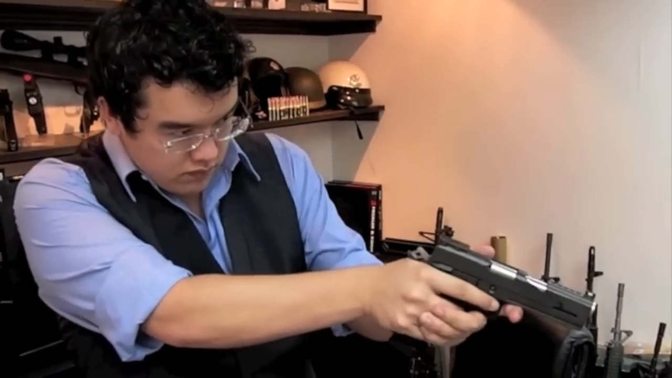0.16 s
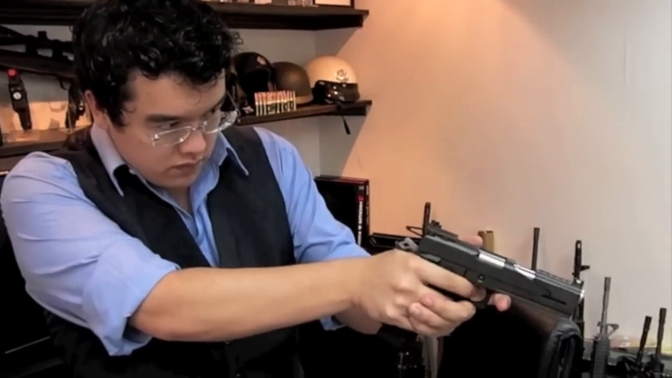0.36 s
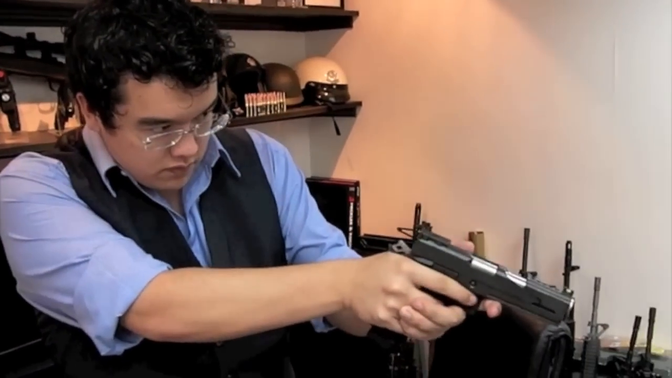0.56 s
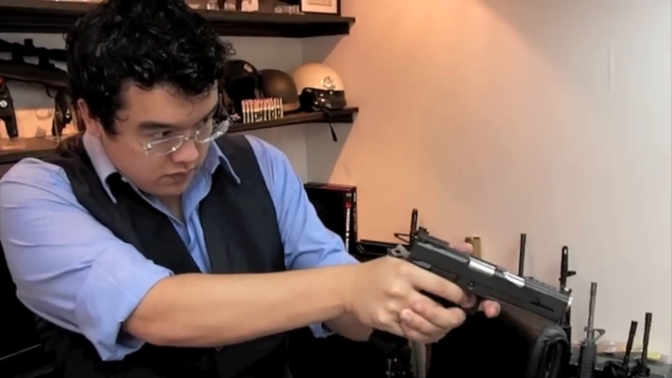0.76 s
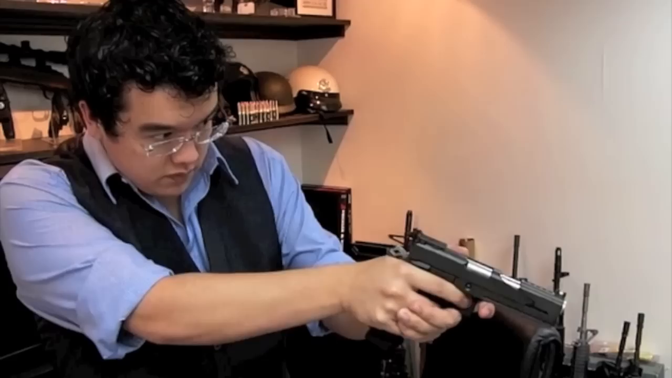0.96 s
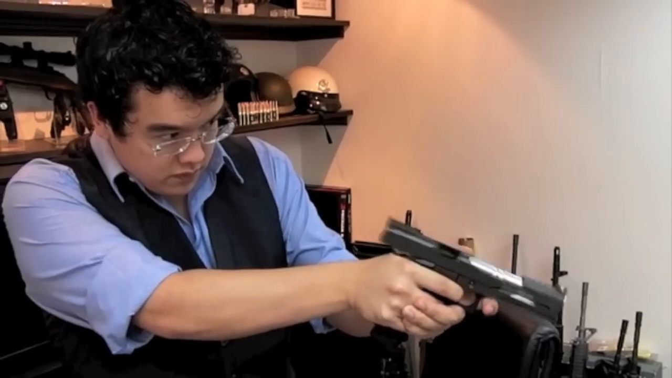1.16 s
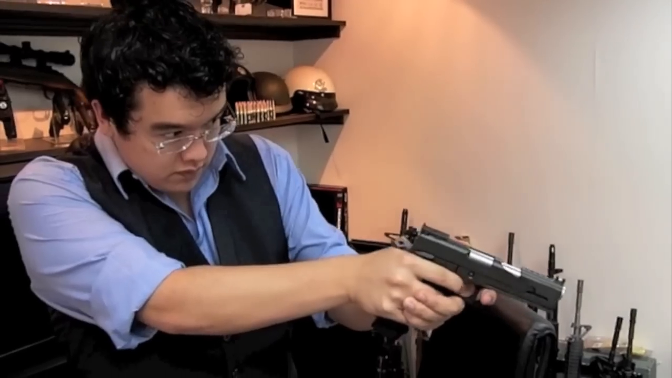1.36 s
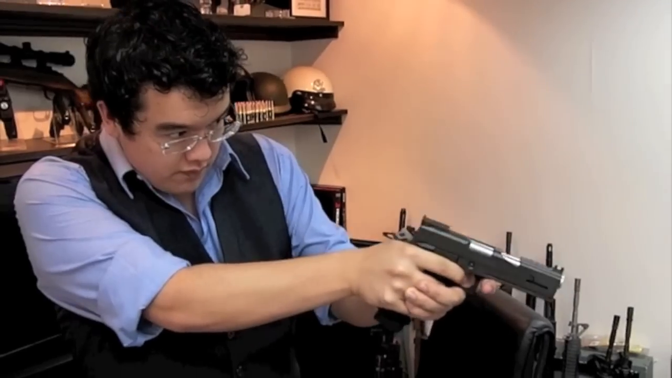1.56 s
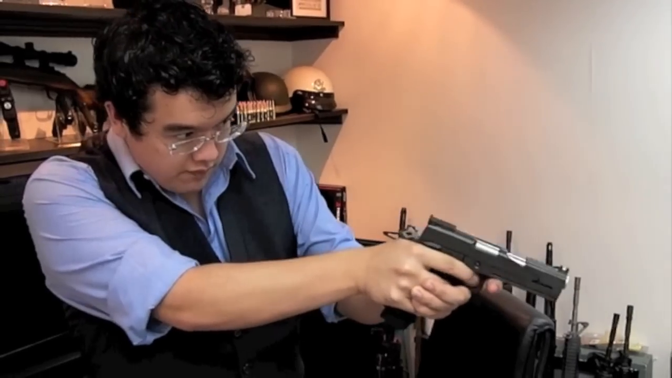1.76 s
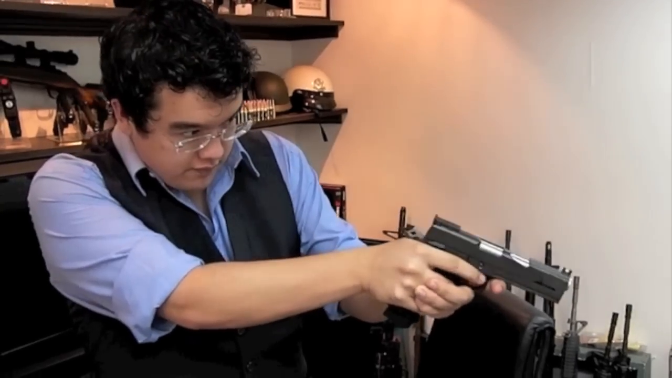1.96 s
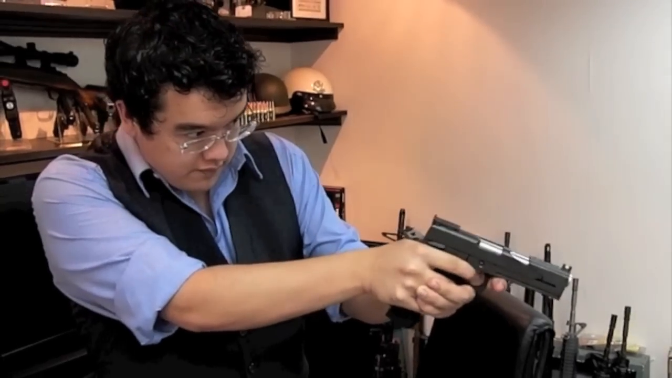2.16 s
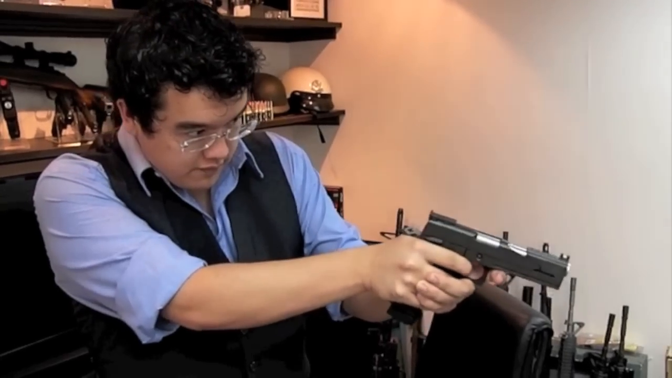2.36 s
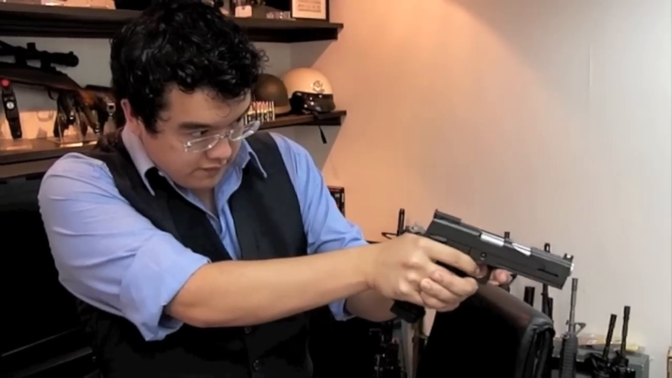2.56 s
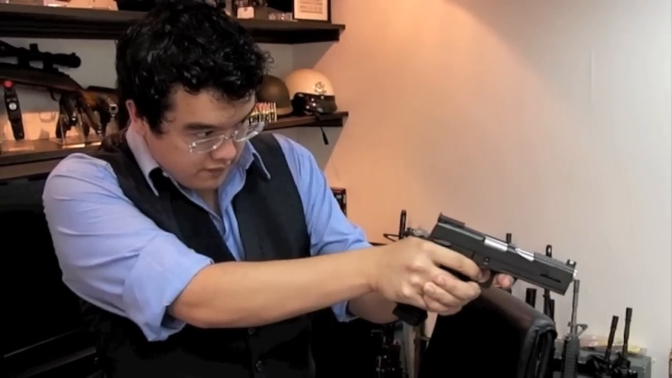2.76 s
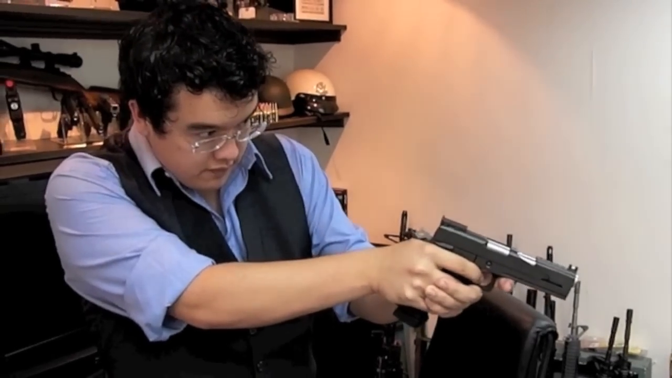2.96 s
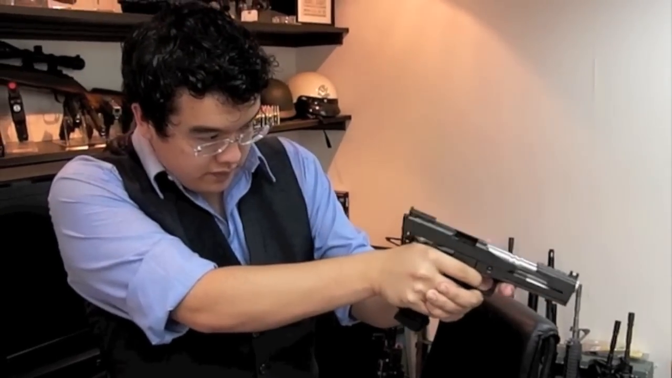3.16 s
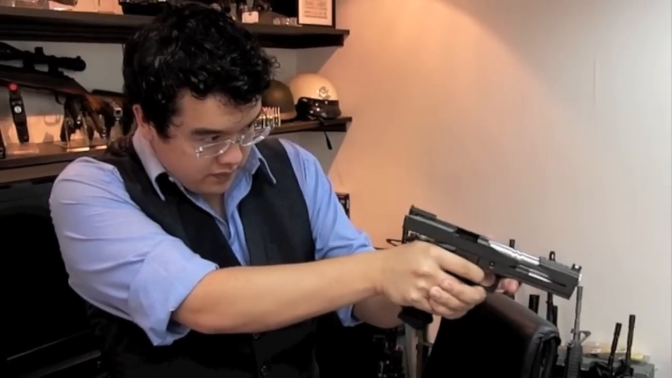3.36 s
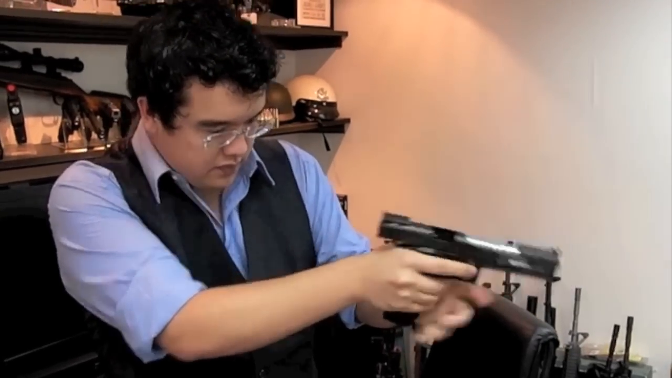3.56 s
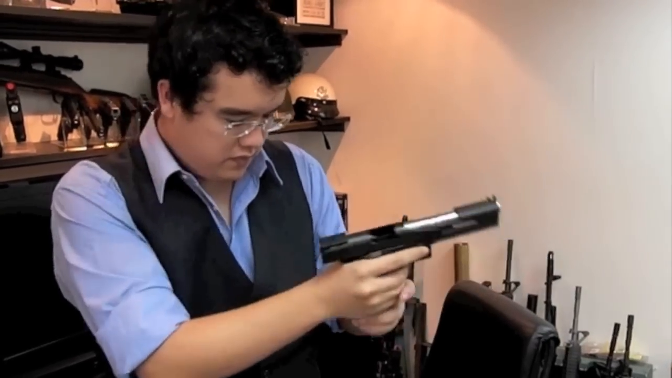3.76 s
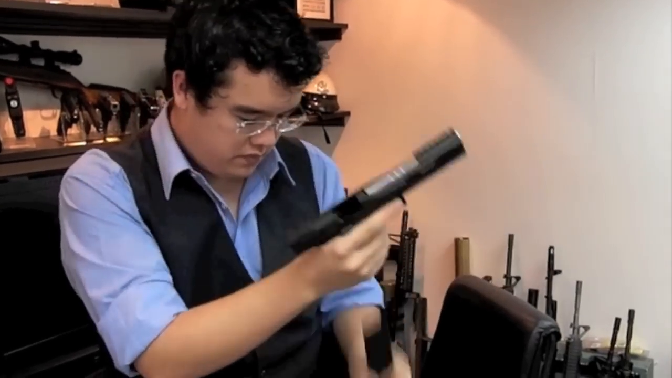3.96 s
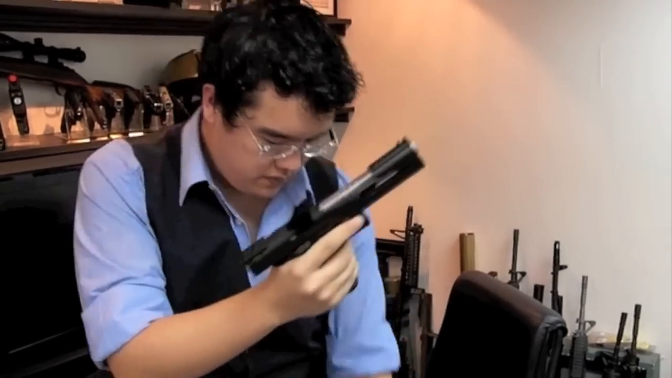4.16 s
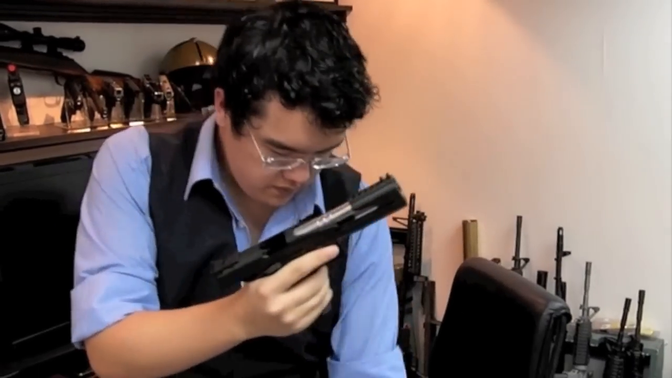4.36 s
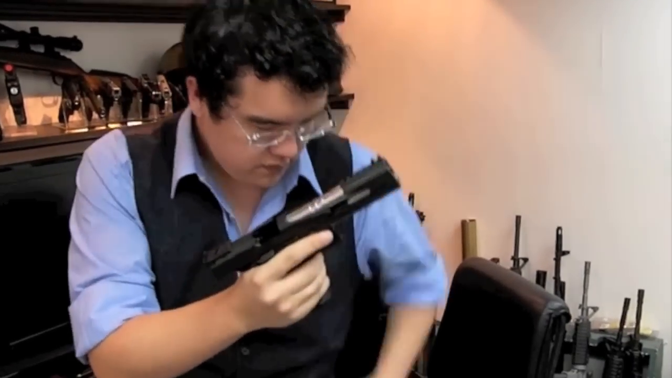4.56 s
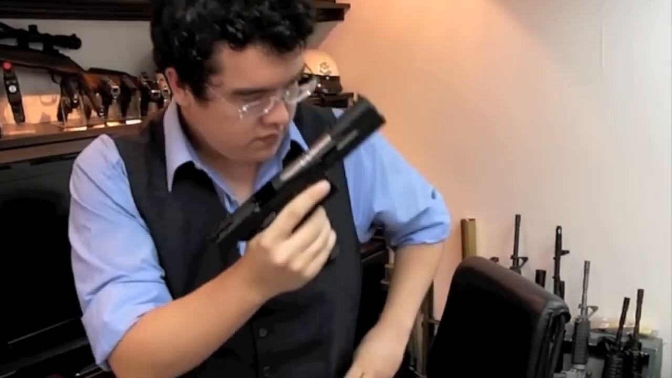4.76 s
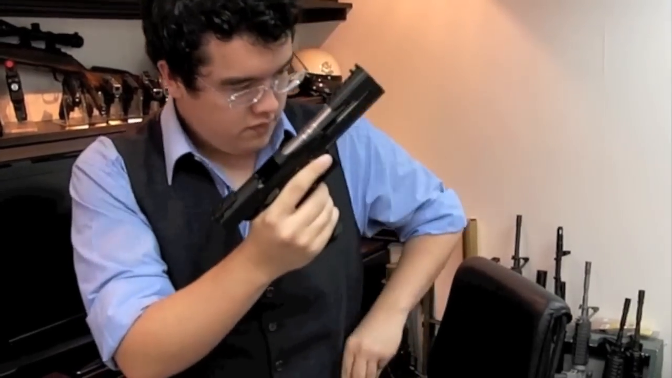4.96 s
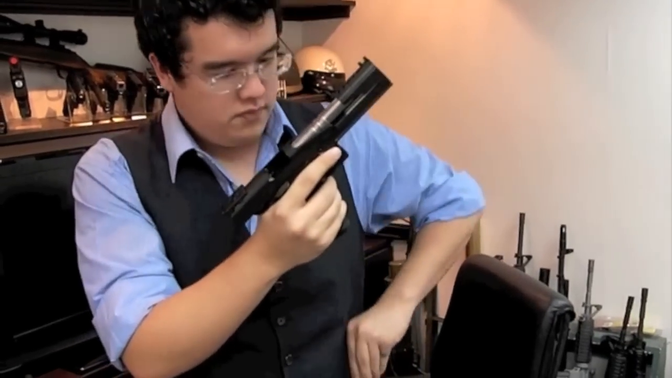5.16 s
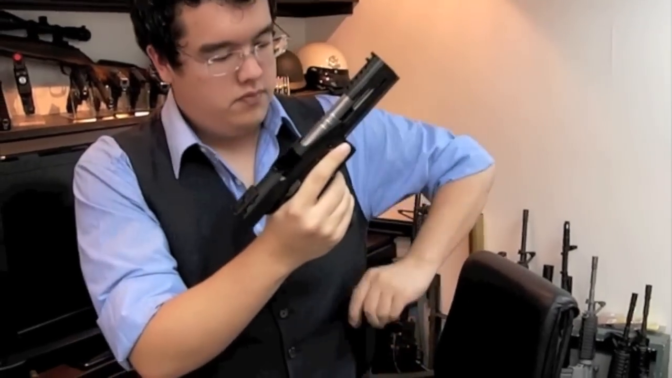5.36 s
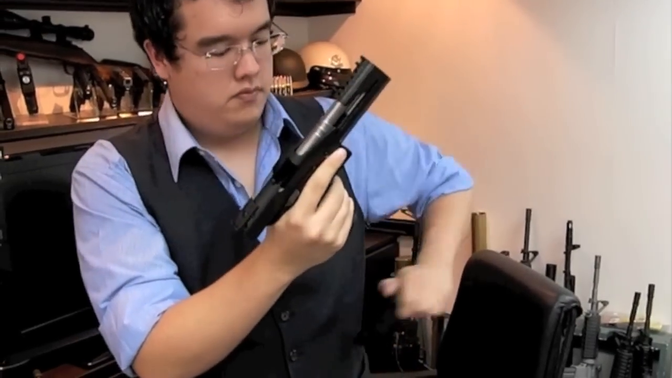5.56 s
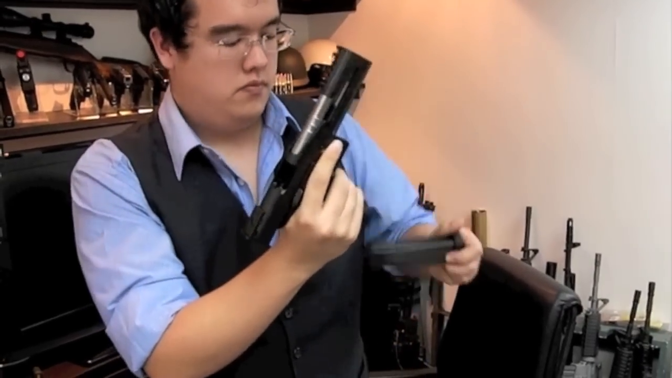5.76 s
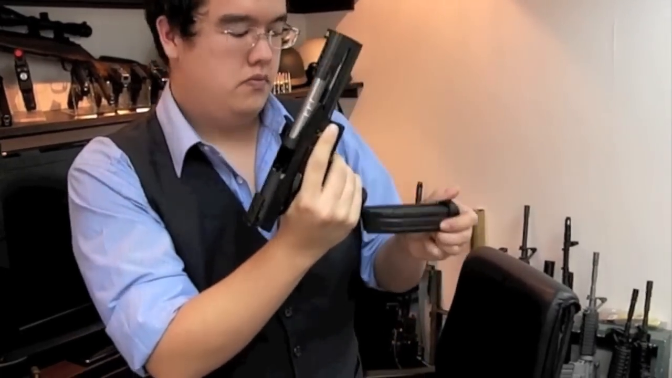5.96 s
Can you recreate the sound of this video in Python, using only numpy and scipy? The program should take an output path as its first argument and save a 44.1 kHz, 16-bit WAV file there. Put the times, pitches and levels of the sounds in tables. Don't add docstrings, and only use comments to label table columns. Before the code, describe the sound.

Dry, punchy gas cracks with a hard slide snap at their tail, heard very close with short room reverberation. The pace goes from deliberate to rapid, pauses, and ends on a single crack that leaves the slide open. Then come light ticks, cloth rubs and magazine clacks. Low mains hum, airy noise and a faint high whine sit beneath, dipping after shots.

```python
import sys
import numpy as np
from scipy import signal
from scipy.fft import rfft, irfft
from scipy.io import wavfile

SR = 44100
rng = np.random.default_rng(int(sys.argv[2]) if len(sys.argv) > 2 else 0)


def to_linear_factor(level_db):
    exponent = np.asarray(level_db, float) / 20
    return 10 ** exponent


def wav_record(signal):
    frames = np.transpose(np.atleast_2d(signal))
    bounded = np.clip(frames, -1, 1)
    quanta = np.round(bounded * 32767).astype(np.int16)
    wavfile.write(sys.argv[1], SR, quanta)


N = 269010
BURST_PEAK_S = .05


def at_hz(points, hz):
    points = np.array(points)
    return np.interp(np.log(hz + 1), np.log(points[:, 0]), points[:, 1])


def rms_one(x):
    return x / np.sqrt(np.mean(x ** 2) + 1e-20)


def coloured(x, spectrum):
    gain = to_linear_factor(at_hz(spectrum, np.fft.rfftfreq(8192, 1 / SR)))
    cepstrum = irfft(np.log(gain))
    cepstrum[1:4096] *= 2
    cepstrum[4097:] = 0
    response = irfft(np.exp(rfft(cepstrum)))[:4096]
    return signal.fftconvolve(x, response)[:len(x)]


def resonance(x, hz, width_hz):
    r = np.exp(-np.pi * width_hz / SR)
    zeros = np.array([1, 0, -1]) * (1 - r * r) / 2
    poles = [1, -2 * r * np.cos(2 * np.pi * hz / SR), r * r]
    return signal.lfilter(zeros, poles, x)


def narrow(x, hz, width_hz):
    return rms_one(resonance(resonance(x, hz, width_hz), hz, width_hz))


def lagged(x, lag_s):
    lag = np.exp(-1 / (lag_s * SR))
    return signal.lfilter([1 - lag], [1, -lag], x)


def sine(hz, t):
    return np.sin(2 * np.pi * hz * t)


def add(out, s, sound):
    at = int(s * SR)
    piece = sound[max(-at, 0):N - at]
    start = max(at, 0)
    out[start:start + len(piece)] += piece


def burst(rise_s, fall_s):
    t = np.arange(8820) / SR - BURST_PEAK_S
    shape = np.exp(np.where(t < 0, t / max(rise_s, 1e-4), -t / max(fall_s, 1e-4)))
    return shape * rng.standard_normal(len(t))


def background_db(t):
    resting_db, ducked_db, recovery_db_per_s = -41, -56, 4
    db = np.full(N, float(resting_db))
    for s, *_ in SHOTS:
        recovering = ducked_db + recovery_db_per_s * (t - s)
        db = np.where(t < s, db, np.minimum(resting_db, recovering))
    return resting_db + lagged(db - resting_db, lag_s=.04)


# (frequency [Hz], level [dB], width [Hz])
HUM_LINES = [(53.3, -6.5, 5), (100.3, 0, 7.6), (200.6, -5, 13), (299.8, -6.5, 3.1), (340.9, -15.5, 17),
             (389, -14, 6.9), (540, -17.5, 2.2), (748, -16, 2), (902, -14.5, 6.4), (1445, -16, 6.6)]
# (frequency [Hz], density [dB per Hz])
AIR_SHARED = [(15, -44), (25, -6.5), (100, 2), (300, -6.5), (1800, -18.5), (2500, -22), (2850, -50),
              (3300, -34.5), (5400, -37.5), (7000, -60.5), (12000, -42.5), (15500, -45.5), (16200, -72.5)]
# (frequency [Hz], density [dB per Hz])
AIR_APART = [(15, -63), (25, -6), (190, -9), (714, -14.5), (860, -10), (1230, -11.5), (1500, -9),
             (2350, -14.5), (2840, -43), (3250, -17), (4870, -29), (7000, -27), (10500, -27), (16000, -25)]


def background():
    white = rng.standard_normal((4, N))
    t = np.arange(N) / SR
    hum = sum(to_linear_factor(db) * narrow(white[2], hz, width_hz) for hz, db, width_hz in HUM_LINES)
    hum = hum + to_linear_factor(-5) * sine(100, t) + to_linear_factor(-12) * sine(200, t) + to_linear_factor(-10) * sine(300, t)
    whine = to_linear_factor(-12) * sine(15735, t)
    gusts = to_linear_factor(4.5 * rms_one(resonance(white[3], hz=3, width_hz=5)))
    rumble = gusts * rms_one(resonance(white[3, ::-1], hz=45, width_hz=40))
    fan = narrow(white[1, ::-1], hz=1450, width_hz=3.9)
    air_shared = rms_one(coloured(white[0], AIR_SHARED))
    air_apart = rms_one(coloured(white[1], AIR_APART))
    both = to_linear_factor(-1.5) * hum + to_linear_factor(-4) * air_shared + to_linear_factor(-8) * rumble + whine
    apart = to_linear_factor(-14) * fan + to_linear_factor(-34) * hum + to_linear_factor(-5.5) * air_apart + to_linear_factor(-17) * whine
    return np.array([both, apart]) * to_linear_factor(background_db(t))


# (time [s], level [dB], centre [Hz], swell [s])
RUBS_HEARD = [(0.02, -36.5, 2700, 0.0047), (0.442, -46, 2460, 0.018), (3.088, -49, 2000, 0.016),
              (3.869, -45.5, 2700, .04), (3.912, -44, 8900, 0.0097), (3.918, -37.5, 4230, 0.026),
              (3.961, -43.5, 2170, 0.0089), (4.409, -35, 1935, 0.0096), (4.562, -49, 2470, 0.04),
              (4.739, -50, 2000, 0.011), (5.089, -44.5, 1966, 0.01), (5.5, -56, 7000, 0.025),
              (5.62, -54.5, 990, 0.07)]
# (time [s], level [dB], centre [Hz], fall [s])
TICKS_HEARD = [(0.423, -38, 3960, 0.0079), (.840, -34.5, 3040, .016), (1.182, -40, 3150, 0.035),
               (2.854, -43.5, 4040, 0.0043), (3.011, -38, 6220, 0.0051), (3.058, -37.5, 3970, 0.0076),
               (3.504, -31.5, 5130, 0.011), (3.511, -35, 2145, 0.0047), (3.677, -27, 2360, 0.0032),
               (3.823, -39.5, 5050, .002), (3.846, -33, 5900, 0.0054), (3.942, -31.5, 2524, 0.009),
               (4.35, -27, 3950, 0.0082), (4.364, -21.5, 630, 0.0023), (4.371, -36, 1740, 0.011),
               (4.649, -23.5, 5000, 0.005), (4.65, -30, 2250, 0.007), (5.238, -45, 1725, 0.021),
               (5.452, -41, 2150, 0.012), (5.535, -31, 2610, 0.0054)]


def handling():
    out = np.zeros(N)
    contacts = [(s, db, hz, .0007, fall_s, 1.7) for s, db, hz, fall_s in TICKS_HEARD]
    contacts += [(s, db, hz, swell_s, 1.4 * swell_s, 2.2) for s, db, hz, swell_s in RUBS_HEARD]
    for s, db, hz, rise_s, fall_s, octaves in contacts:
        edges = np.clip(hz * 2 ** (np.array([-.5, .5]) * octaves), 50, 20000)
        bandpass = signal.butter(1, edges, "band", fs=SR, output="sos")
        noise = signal.sosfilt(bandpass, burst(rise_s, fall_s))
        evened = noise * np.sqrt(SR / 2 / (edges[1] - edges[0])) / 3
        add(out, s - BURST_PEAK_S, to_linear_factor(db) * evened)
    return out


def pop(hz, width_hz):
    t = np.arange(900) / SR
    return -sine(hz, t) * np.exp(-np.pi * width_hz * t)


def strike(out, s, db, rise_s, fall_s):
    add(out, s - BURST_PEAK_S, to_linear_factor(db) * burst(rise_s, fall_s))


# (frequency [Hz], level [dB], 60 dB decay [s])
SLIDE_RING = [(1190, -9, .05), (1357, -12, .05), (2110, 5, .008), (2150, -9, .06), (2290, -10, .05),
              (3600, -3, .01), (10600, 4, .008)]


def slide_ring(slam_db):
    t = np.arange(9000) / SR
    ring = np.zeros(len(t))
    for hz, db, t60 in SLIDE_RING:
        luck = rng.normal(0, 1.5)
        ring += to_linear_factor(slam_db - 20 + db + luck - 60 * t / t60) * sine(hz, t)
    return ring


# (time [s], blast level [dB], rear stop level [dB], slide slam level [dB])
SHOTS = [
    (.048, -0.5, -42, -18.5),
    (.461, 0, -14.5, -17),
    (.866, 1, -19.5, -17.5),
    (1.211, 0.5, -20.5, -13.5),
    (1.468, -6, -35, -10.5),
    (1.673, -5.5, -14, -9.5),
    (1.889, -2, -19, -11.5),
    (2.111, -3.5, -12, -11.5),
    (2.346, -4.5, -10, -10.5),
    (3.132, -3, -34.5, -88.5),
]
# (frequency [Hz], level [dB])
GAS_JET = [(200, -14), (1000, -9.5), (2000, -5.5), (4000, 0.5), (7000, -1.5), (16000, -2.5)]


def pistol(stance):
    slam_s, bounce_s = .0585, .0155
    jet, out = np.zeros((2, N))
    for s, blast_db, stop_db, slam_db in SHOTS[stance::3]:
        strike(jet, s - .0035, blast_db - 22, rise_s=.0005, fall_s=.003)
        hiss = np.diff(burst(rise_s=.0005, fall_s=.002))
        add(jet, s - BURST_PEAK_S - .0012, to_linear_factor(blast_db - 9) * hiss)
        strike(jet, s + .00099, blast_db + 1.5, rise_s=.0008, fall_s=.0026)
        muzzle = pop(hz=377, width_hz=390) + .63 * pop(hz=840, width_hz=230)
        add(out, s - .0003, to_linear_factor(-11.5) * muzzle)
        wall = pop(hz=702, width_hz=330) + .6 * pop(hz=1250, width_hz=700)
        add(out, s + .0116, to_linear_factor(-3.5) * wall)
        strike(jet, s + .0235, stop_db, rise_s=.002, fall_s=.003)
        strike(jet, s + slam_s + .0008, slam_db + 5, rise_s=.0009, fall_s=.0011)
        strike(jet, s + slam_s + bounce_s, slam_db - 11, rise_s=.001, fall_s=.003)
        ring = slide_ring(slam_db)
        add(out, s + slam_s, ring)
        add(out, s + slam_s + bounce_s, .9 * ring)
    return out + coloured(jet, GAS_JET)


# (frequency [Hz], 60 dB decay [s])
ROOM_DECAY = [(100, 0.17), (260, 0.52), (700, 0.2), (1840, .36), (4850, 0.42), (12800, 0.32)]


def room(white, onset_s):
    t = np.arange(SR // 2) / SR
    fresh = rng.standard_normal(white.shape)
    out = 0
    for k, hz in enumerate(60 * 2. ** np.arange(9)):
        edges = [hz / np.sqrt(2), min(hz * np.sqrt(2), 21000)]
        bandpass = signal.butter(2, edges, "band", fs=SR, output="sos")
        noise = white if k < 5 else fresh
        out = out + signal.sosfilt(bandpass, noise[k % 2]) * to_linear_factor(-60 * t / at_hz(ROOM_DECAY, hz))
    out = out * (1 - np.exp(-(t / onset_s) ** 2))
    return out / np.sqrt(np.sum(out ** 2))


def notched(x):
    x = x - .9 * resonance(x, hz=2870, width_hz=330)
    return x - .6 * resonance(x, hz=5000, width_hz=200)


# (delay [s], level [dB])
NEAR_WALLS = [(.0122, -14), (.0245, -18), (.036, -21)]


def at_ports(sources, colour, level_db, wet_db, onset_s):
    white = rng.standard_normal((2, SR // 2))
    direct = sum(sources)
    heard = direct.copy()
    scatter = rng.standard_normal((len(NEAR_WALLS), 60)) / np.sqrt(60)
    scatter = signal.lfilter([.6], [1, -.6], scatter)
    for (s, db), taps in zip(NEAR_WALLS, scatter):
        add(heard, s, to_linear_factor(db) * np.convolve(direct, taps)[:N])
    for source in sources:
        heard = heard + to_linear_factor(wet_db) * signal.fftconvolve(source, room(white, onset_s))[:N]
    return to_linear_factor(level_db) * notched(coloured(heard, colour))


# (frequency [Hz], width [Hz], share [ratio])
LOW_MODES = [(202.2, 13, 0.9), (257, 120, -0.68), (325, 83, 0.45), (441.6, 76, -0.56), (528, 22, 0.48),
             (667.4, 5.5, -0.031), (852.7, 14, 0.15)]


def standing_waves(x):
    return x + sum(np.clip(share, -1, 2) * resonance(x, hz, width_hz) for hz, width_hz, share in LOW_MODES)


# (frequency [Hz], level [dB])
SUM_COLOUR = [(65, -39), (110, -16.5), (325, 0.5), (376, -2), (463, 1.5), (536, -8), (717, -2), (848, -9.5),
              (1230, 2), (2210, -1), (2840, -10), (4200, -12), (7250, -38), (10500, -20), (16000, -39.5)]
# (frequency [Hz], level [dB])
DIFFERENCE_COLOUR = [(262, -28), (450, -15.5), (900, -16), (1340, 3), (2190, 3), (2650, 1.5), (3200, -8.5),
                     (4200, -8), (5500, -12), (7570, -31.5), (10500, -5.5), (11900, -7), (14200, -23.5),
                     (16000, -39.5)]


def scene():
    sources = [pistol(stance=0), pistol(stance=1) + handling(), pistol(stance=2)]
    both, apart = background()
    both = both + standing_waves(at_ports(sources, SUM_COLOUR, level_db=10, wet_db=-6, onset_s=.0012))
    apart = apart - at_ports(sources, DIFFERENCE_COLOUR, level_db=9.5, wet_db=-1.62, onset_s=.003)
    return np.array([both + apart, both - apart])


# (frequency [Hz], level [dB])
RIGHT_CAPSULE = [(60, 0.5), (700, 1.5), (1300, -3.5), (4400, -1), (7500, 4.5), (10500, 2.5), (13000, -2)]


def unequal_capsules(pair):
    return np.array([pair[0], coloured(pair[1], RIGHT_CAPSULE)])


def limiter(pair, knee_db, share, release_db_per_s):
    level_db = 20 * np.log10(np.max(np.abs(pair), axis=0) + 1e-9)
    ramp = release_db_per_s * np.arange(N) / SR
    held_db = np.maximum.accumulate(share * (level_db - knee_db) + ramp) - ramp
    cut_db = np.maximum(held_db, 0)
    return pair * to_linear_factor(-lagged(cut_db, lag_s=.011))


def patchy_treble(pair, sum_db, difference_db, quiet_db):
    hz, _, spec = signal.stft([pair[0] + pair[1], pair[0] - pair[1]], SR, "cosine", 2048)
    edges = np.searchsorted(hz, np.geomspace(2500, 17000, 30))
    frame = np.sum(np.abs(spec[:, 46:]) ** 2, axis=(0, 1))
    attack = frame > 5 * np.roll(frame, 1)
    frame = frame * np.minimum(frame * to_linear_factor(-2 * quiet_db), 1) ** .15
    bar = frame * to_linear_factor(-2 * np.array([[sum_db], [difference_db]]))
    for low, high in zip(edges, edges[1:]):
        power = np.mean(np.abs(spec[:, low:high]) ** 2, axis=1)
        luck = to_linear_factor(rng.normal(0, 1, bar.shape) * [[5.5], [3.]])
        kept = (power > bar * luck) | attack
        spec[:, low:high] *= kept[:, None]
    both, apart = signal.istft(spec, SR, "cosine", 2048)[1][:, :N] / 2
    return np.array([both + apart, both - apart])


def roll_off(x):
    return signal.sosfilt(signal.butter(12, 16450, fs=SR, output="sos"), x)


def record(dry):
    pair = limiter(unequal_capsules(dry), knee_db=-5.5, share=.25, release_db_per_s=90)
    ceiling = .9
    pair = ceiling * np.tanh(pair / ceiling)
    top_cut = signal.cheby2(12, 60, 16500, fs=SR, output="sos")
    pair = signal.sosfilt(top_cut, pair)
    mix = patchy_treble(pair, sum_db=41, difference_db=49, quiet_db=-31)
    return roll_off(mix)


dry = scene()
out = record(dry)
wav_record(out)
```